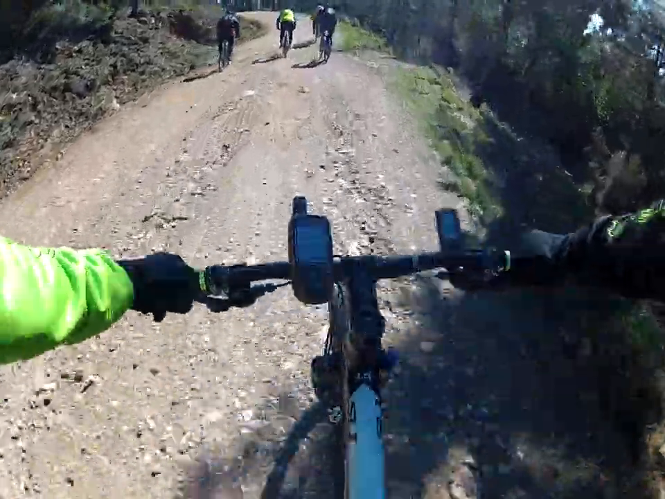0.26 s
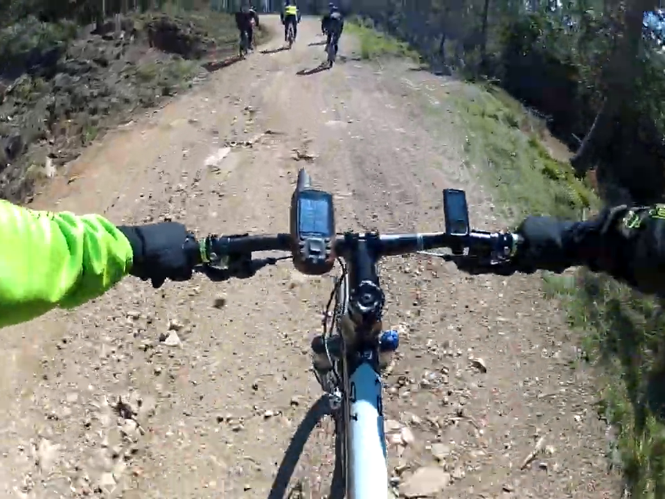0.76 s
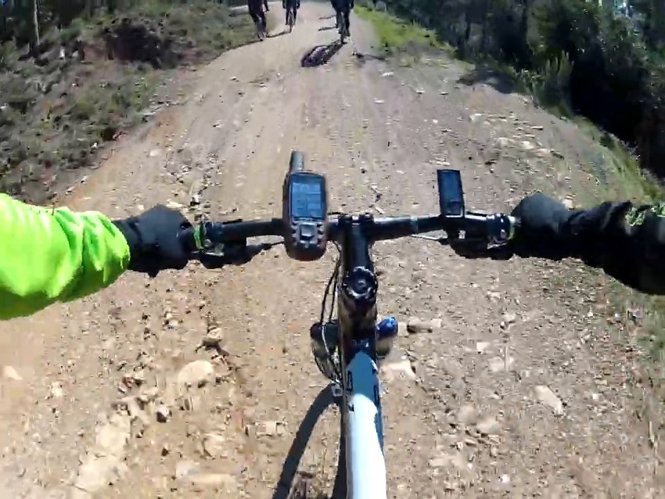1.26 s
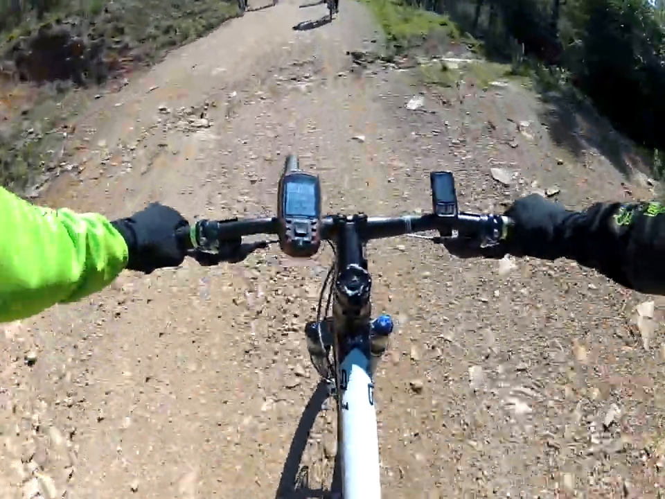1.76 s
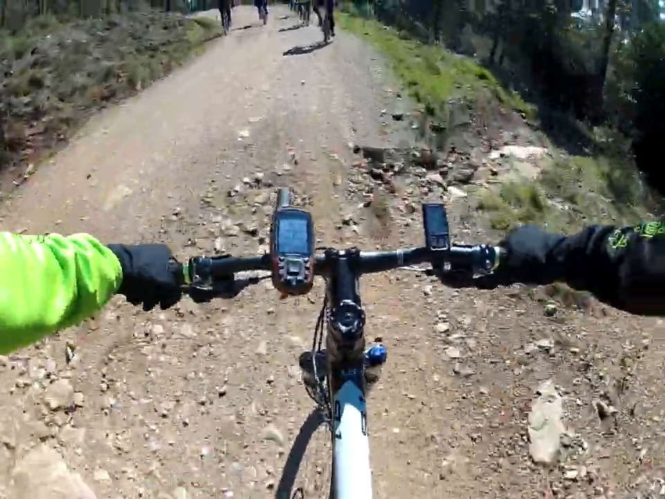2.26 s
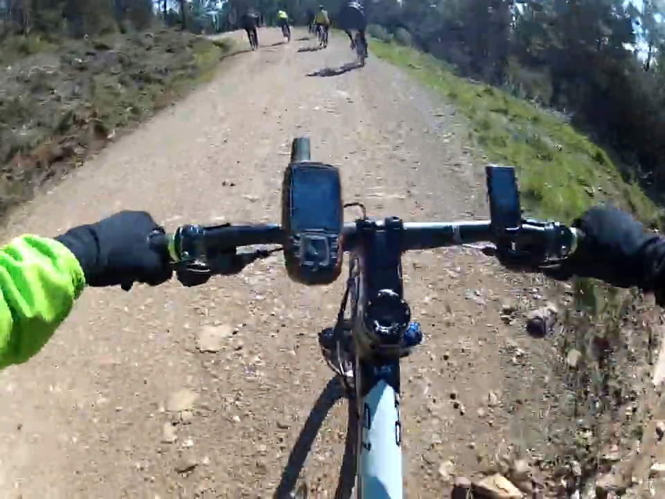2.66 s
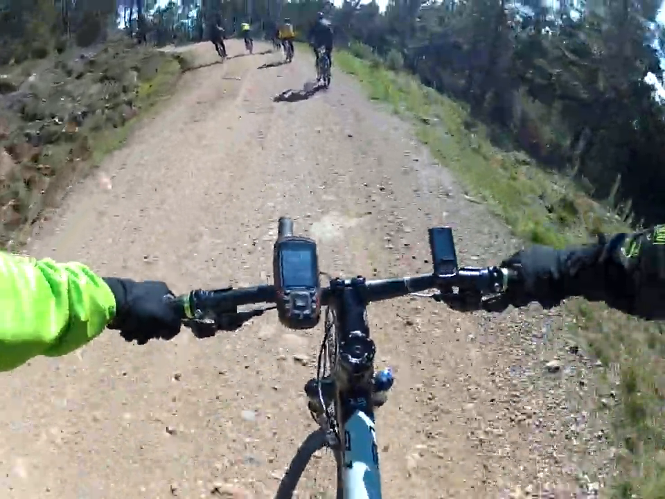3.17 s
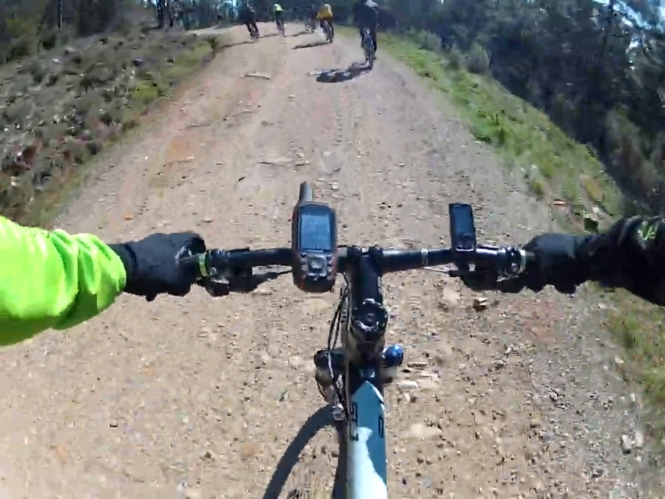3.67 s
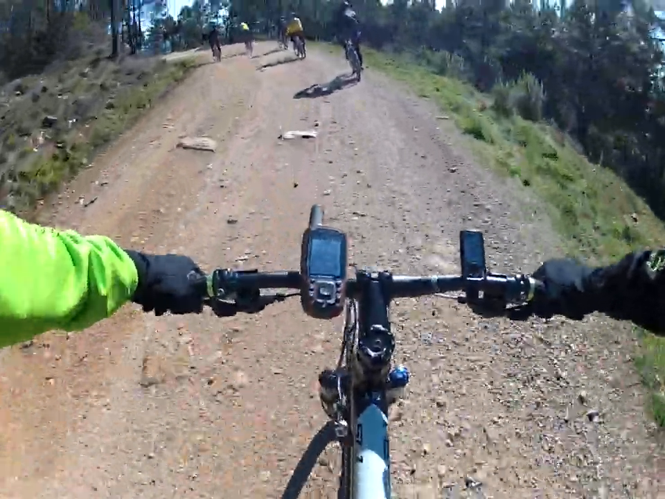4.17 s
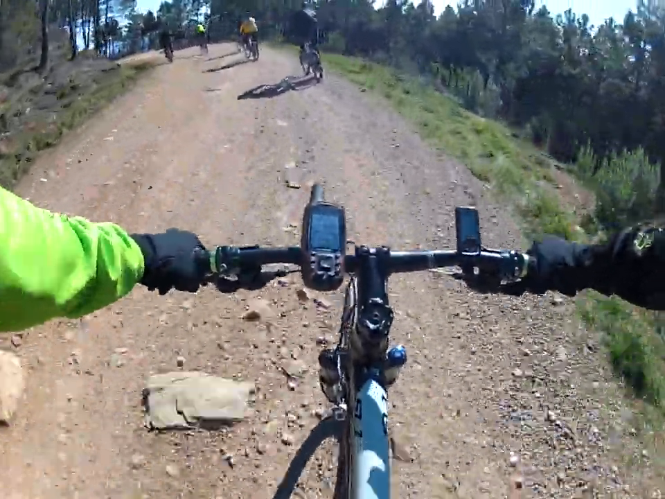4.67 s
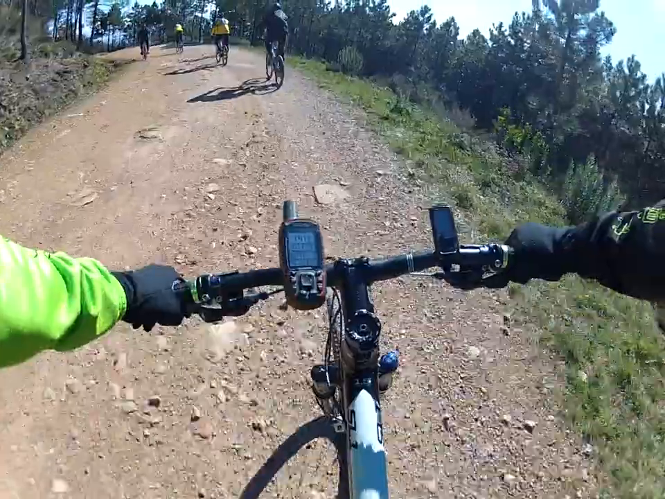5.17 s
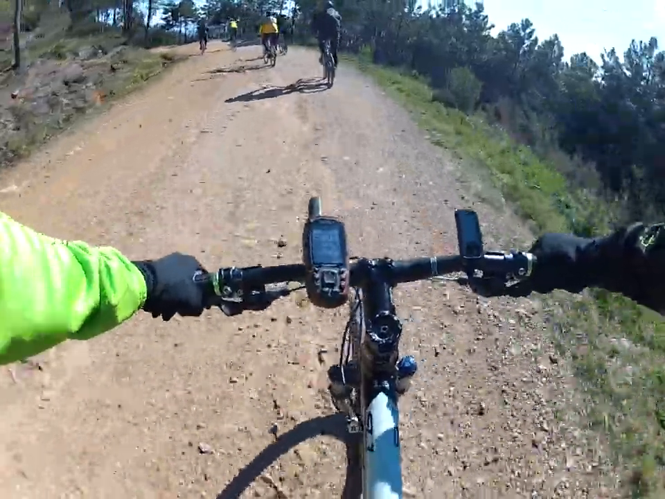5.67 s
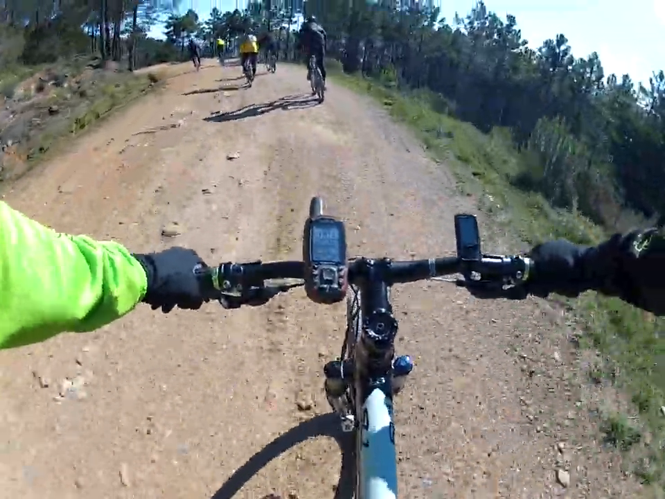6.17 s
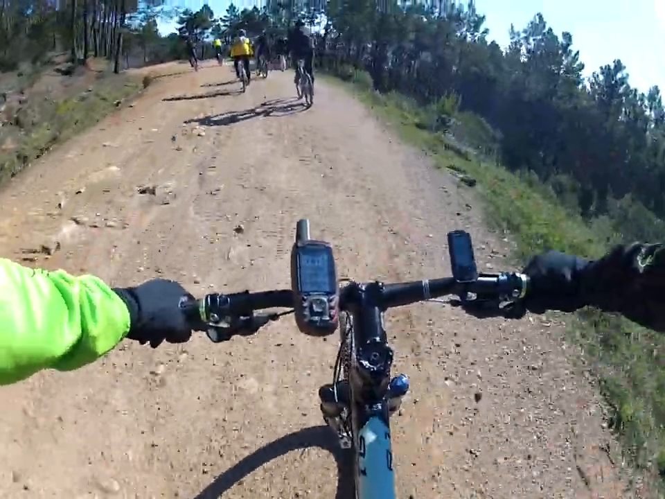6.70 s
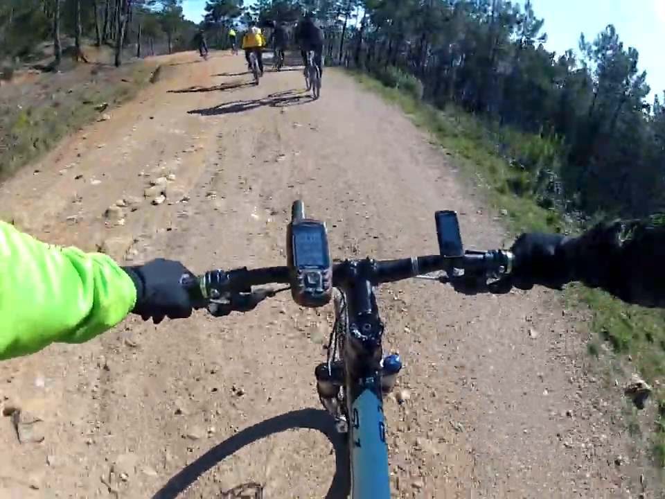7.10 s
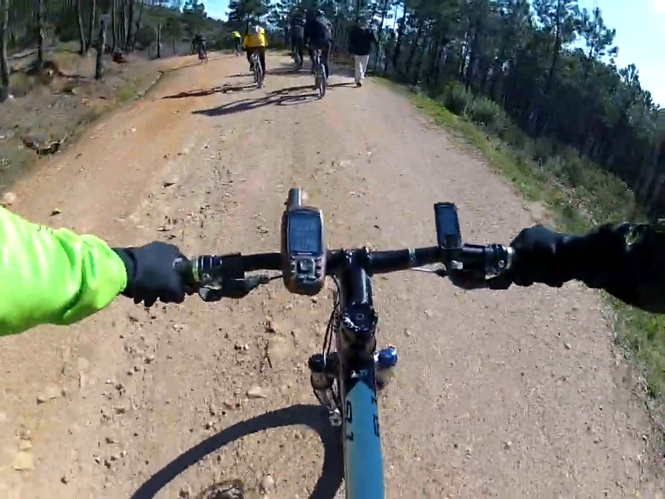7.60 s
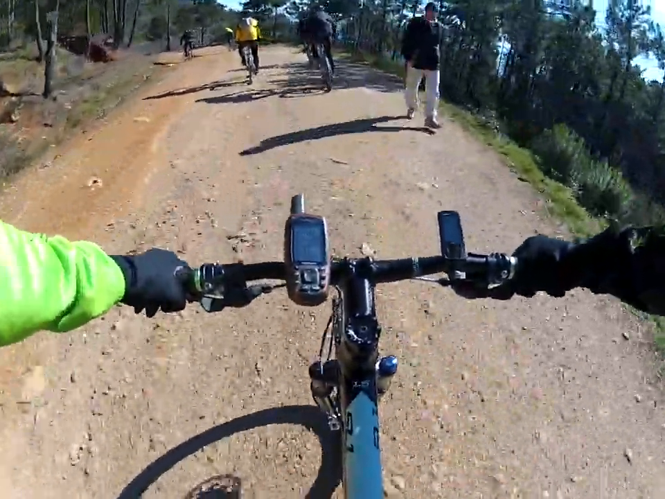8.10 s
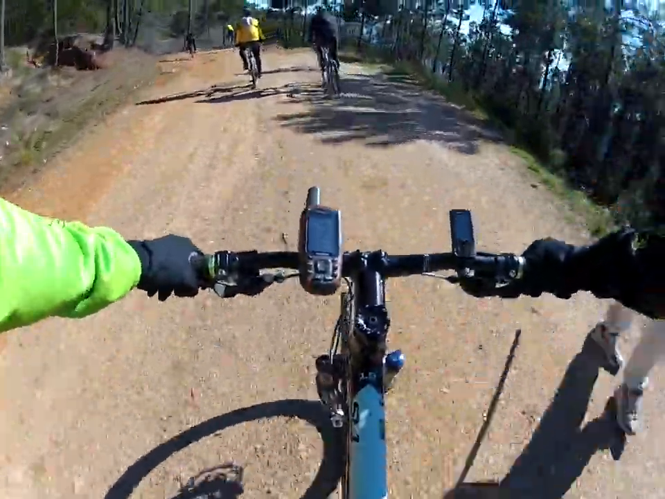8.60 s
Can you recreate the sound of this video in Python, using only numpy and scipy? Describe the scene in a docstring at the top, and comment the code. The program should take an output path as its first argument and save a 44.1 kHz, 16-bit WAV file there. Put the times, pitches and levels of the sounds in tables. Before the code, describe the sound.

A mountain bike rolls down an open gravel track, heard close and dry from a cased camera on the rider's chest. Tyres rumble and roar unevenly over a continuous gritty crunch of pebbles, while low wind flutters and thumps. At about 0.5 s a hard jolt knocks the mount, with a harness thump and loose clacks. From 0.8 to 1.8 s soft frame thuds come often, amid stone snaps, gusts and a clack near 1.7. Rough drumming continues around 2.5 to 2.9 s; a brief tread hum swells near 3.5. At 4.1 to 4.2 s hollow clacks and bright chip ticks cluster. The rumble then eases, with a strong gust at 4.8 and more rattles at 4.9. Sharp stones snap at 5.9, then thickly from 6.4 to 7.05 s. Rougher rumble returns after 7.3, with a clack at 8.25 and final snaps at 8.3 and 8.8.

```python
"""Tyres rumble and crunch over gravel, stones snap, loose parts clack, wind buffets and a jolt knocks.
A mountain bike rolls down a gravel track, heard from a cased camera on the rider's chest.
Rumble, hiss and wind are shaped noise; grains, stones and chips are short noise bursts or fading tones.
The frame, case, loose part and camera mount ring as sets of fading tones. The case colours everything."""
import sys
import numpy as np
from scipy import signal
from scipy.fft import rfft, irfft, next_fast_len
from scipy.io import wavfile
from scipy.ndimage import uniform_filter1d, map_coordinates

SR = 44100
rng = np.random.default_rng(int(sys.argv[2]) if len(sys.argv) > 2 else 0)


def transcribe(u):
    """Save the signal u as a 16-bit wav file named by the first command-line argument.

    u: samples, shape (n,) or (channels, n), limited to [-1, 1]; the rate is SR.
    q: integer samples, one column per channel.
    """
    v = np.clip(np.atleast_2d(u).T, -1, 1)
    q = np.round(v * 32767).astype(np.int16)
    wavfile.write(sys.argv[1], SR, q)


N = 390285  # length in samples

# Levels in the tables are starting points: the functions may shift or vary them.
# "Fade time" means the time to fall by 60 dB.

# How hard the wind buffets. Each row: time in seconds, level in dB.
WIND_LEVEL = [(0.0, -32.5), (0.17, -41.5), (0.98, -38), (1.06, -43.5), (1.5, -35.5), (2.86, -43.5),
              (3.89, -41.5), (3.97, -31.5), (4.26, -40.5), (4.41, -36.5), (5.02, -36), (5.16, -47.5),
              (5.56, -36), (6.16, -43.5), (6.63, -40.5), (6.68, -48), (7.4, -39), (8.85, -42)]
# Single strong gusts. Each row: middle in seconds, level in dB, rate of the pressure swing in Hz.
GUSTS = [(.28, -26, 32.3), (0.528, -28, 30.2), (.78, -32, 32), (.955, -27, 33), (1.461, -24.5, 41.5),
         (1.608, -30, 48.3), (1.679, -32, 45), (1.82, -26, 28), (2.05, -27, 27.5), (3.914, -31, 34.2),
         (3.99, -30, 27.6), (4.491, -33, 30.2), (4.779, -20.5, 31), (5.02, -25.5, 30.8), (5.51, -35, 42),
         (5.72, -44, 48), (6.579, -27, 27)]
# Tone of the wind. Each row: frequency in Hz, relative level in dB per Hz.
BUFFET_TONE = [(8, -38), (18, 1.5), (28, -4.5), (45, -13.5), (70, -21.5), (120, -33), (300, -75),
               (1000, -100)]

# Jolts on the camera mount. Each row: start in seconds, level in dB.
JOLTS = [(.5266, -19.5)]
# Ringing tones of the mount. Each row: frequency in Hz, level in dB, fade time in seconds.
MOUNT_MODES = [(498, -8, 0.03), (770, -18, 0.025), (1020, -5.5, 0.016), (1630, -2.5, 0.017),
               (1780, -6.5, 0.018), (10200, -14, 0.011), (12650, -8.5, 0.013), (13900, -20, 0.016)]
# Thump of the chest harness. Each row: frequency in Hz, level in dB, fade time in seconds.
HARNESS_MODES = [(88, 2.5, 0.055), (137, -2, 0.052), (261, -17, 0.018)]

# Loose parts clacking on bumps. Each row: start in seconds, level in dB, pitch of the lowest tone in Hz.
CLACKS = [(0.483, -38.5, 1560), (0.541, -37.5, 1590), (1.44, -38.5, 1570), (1.6702, -43.5, 1580),
          (1.722, -32, 1555), (2.8567, -40, 1580), (3.7184, -44, 1520), (4.0923, -31.5, 1575),
          (4.152, -32, 1564), (4.22, -36, 1590), (4.387, -43.5, 1560), (4.892, -38, 1570),
          (4.938, -36.5, 1565), (7.473, -40, 1560), (8.2485, -38.5, 1560)]
# Ringing tones of the loose part, moved to each clack's pitch.
# Each row: frequency in Hz, level in dB, fade time in seconds.
PART_MODES = [(1582, -0.5, 0.032), (1960, 1.5, 0.0062), (2340, -17, 0.0056), (2710, -5.5, 0.015),
              (3130, -9, 0.015), (4450, -17, 0.016), (10510, -16.5, 0.032)]
# Tone of the click in a clack. Each row: frequency in Hz, relative level in dB per Hz.
CLICK_TONE = [(300, -6), (1000, 12), (1500, -15), (2000, 10), (3000, 7), (4500, 1.5), (7500, 2),
              (10000, -2), (15000, 2.5)]

# Flung chips of stone ticking on the frame. Each row: start in seconds, level in dB.
CHIPS = [(0.438, -43), (.444, -42), (1.416, -42), (1.723, -44), (3.546, -46), (3.877, -44), (4.147, -35),
         (4.153, -32), (4.222, -29), (4.231, -38), (4.8272, -34.5), (4.907, -41), (7.627, -46),
         (8.3327, -41), (8.818, -43)]
# Tone of a chip's tick. Each row: frequency in Hz, relative level in dB per Hz.
CHIP_TONE = [(800, -11), (2500, 6.5), (4200, 1.5), (5500, -0.5), (8000, -1), (10000, -16), (15000, -9)]

# Rocks that thud through the frame. Each row: start in seconds, level in dB.
THUDS = [(0.348, -40), (0.741, -32), (.81, -27), (1.187, -28.5), (1.32, -25.5), (1.463, -24.5),
         (1.597, -26), (1.745, -32), (2.484, -32), (2.89, -31), (3.106, -27), (3.793, -34), (3.889, -25.5),
         (3.967, -29), (4.769, -29), (4.985, -36), (6.576, -35), (7.212, -32), (8.093, -30.5), (8.61, -31)]
# Ringing tones of the frame on its tyres. Each row: frequency in Hz, level in dB, fade time in seconds.
FRAME_MODES = [(90.6, -1, 0.082), (151, -13, 0.08), (220, -8.5, 0.033)]
# Dull tone of a tyre on rock. Each row: frequency in Hz, relative level in dB per Hz.
IMPACT_TONE = [(60, 5), (200, 4), (400, -15), (900, -7), (2000, -10.5), (3200, -31), (8000, -39)]

# The track is rocky, then smoother from about 4.3 to 7 s.
# Each row: time in seconds, frame shudder in dB, tyre roar in dB.
GROUND_LEVELS = [(0.0, -50, -54), (0.76, -47, -51.5), (1.21, -52, -57.5), (1.55, -44.5, -52),
                 (1.9, -48.5, -53.5), (2.24, -50, -57), (2.59, -48, -52.5), (3.82, -50, -55),
                 (3.97, -48, -56), (4.51, -59.5, -61), (4.95, -58, -58.5), (6.01, -59, -61.5),
                 (6.36, -54, -60.5), (6.92, -60, -65.5), (7.32, -50, -56.5), (7.96, -56, -60),
                 (8.28, -49.5, -55.5), (8.85, -52.5, -58)]
# Rocky patches that the tyres drum over. Each row: middle in seconds, length in seconds, added dB.
PATCHES = [(0.475, 0.12, 6), (0.735, 0.11, 3.5), (1.346, 0.11, 7.5), (2.464, 0.054, 5.5), (2.536, 0.048, 6),
           (2.703, 0.057, 5), (2.833, 0.048, 2), (4.126, 0.17, 3), (4.907, 0.091, 3.5), (5.247, 0.055, 2),
           (6.583, 0.13, 2.5), (7.07, 0.12, 2.5), (7.493, .05, 4.5), (7.61, 0.058, 3.5), (8.096, 0.19, 3.5)]
# Ridges that press the tread into a brief louder hum. Each row: middle in seconds, level in dB.
RIDGES = [(2.18, -52), (2.45, -64), (3.461, -45), (4.92, -51), (4.97, -52), (5.47, -58), (5.84, -63)]
# Tone of the frame shudder. Each row: frequency in Hz, relative level in dB per Hz.
SHUDDER_TONE = [(35, -16.5), (80, 3.5), (150, -0.5), (210, -3.5), (300, -13), (480, -19.5), (1500, -58)]
# Tone of the tyre roar. Each row: frequency in Hz, relative level in dB per Hz.
ROAR_TONE = [(150, -10.5), (350, -1.5), (550, -2.5), (900, -4), (1300, -11), (2200, -9), (5000, -31),
             (15000, -20.5)]
# Tone of the tread hum. Each row: frequency in Hz, relative level in dB per Hz.
HUM_TONE = [(170, -33), (240, -7), (270, -1), (330, 0), (365, -2), (410, -14), (560, -29.5)]

# How loudly the gravel crunches. Each row: time in seconds, level in dB.
GRAVEL_LEVEL = [(0.0, -56), (0.57, -57.5), (1.08, -55.5), (1.9, -53), (2.17, -53), (4.63, -54), (5.03, -50),
                (5.44, -54), (6.41, -54), (6.56, -51), (7.02, -61), (7.49, -51.5), (7.81, -57.5),
                (8.23, -53), (8.35, -58), (8.85, -58.5)]
# Tone of the gravel crunch. Each row: frequency in Hz, relative level in dB per Hz.
CRUNCH_TONE = [(200, -27), (700, -11.5), (1400, 0), (2200, 3.5), (3000, -4.5), (4000, -9), (5000, -15.5),
               (7000, -18), (9000, -12.5), (11000, -20), (15000, -17.5), (16000, -40)]
# Pebbles knocking together. Each row: ratio to the main pitch (no unit), level in dB.
PEBBLE_MODES = [(1, -2), (1.47, -7.5), (4, -12)]
# Bright crack of a pebble. Each row: frequency in Hz, relative level in dB per Hz.
CRACK_TONE = [(1500, -17), (2400, 8), (3400, 9.5), (4500, -4.5), (7000, -8), (9000, 0), (11500, -7.5),
              (14500, 0), (16000, -24)]
# Pockets of loose gravel under the tread. Each row: middle in seconds, length in seconds, level in dB.
POCKETS = [(0.016, 0.011, -40), (0.162, 0.012, -42.5), (.27, 0.034, -46), (0.703, 0.044, -49),
           (0.867, 0.011, -47.5), (1.817, 0.048, -44), (1.923, 0.035, -46), (2.19, 0.054, -49),
           (2.566, 0.016, -44), (2.89, 0.015, -42), (2.947, 0.0097, -44), (3.722, 0.011, -52),
           (4.127, .04, -42), (4.184, .025, -46), (4.237, 0.072, -49), (4.659, 0.019, -50),
           (4.736, 0.025, -48.5), (4.912, 0.055, -48), (5.044, 0.026, -47), (5.464, 0.0092, -48),
           (5.87, 0.035, -47.5), (6.553, 0.022, -49), (7, 0.061, -50.5), (7.162, 0.013, -49),
           (7.209, .014, -51), (7.363, 0.056, -52.5), (8.104, 0.027, -56), (8.222, 0.042, -46)]

# Large stones snapping under the tyres. Each row: start in seconds, level in dB,
# pitch of the brief ring in Hz, brightness of the case's ring in dB per octave.
STONES = [(0.396, -29.5, 2480, 6), (0.4464, -37, 2100, 0), (0.4817, -34, 1850, -10), (0.8607, -46, 2330, 4),
          (1.0191, -39, 2380, 4), (1.1069, -38.5, 2350, 2), (1.146, -39, 2320, 0), (1.1603, -34, 2170, -5),
          (1.3318, -31, 2410, 10), (1.376, -35.5, 2350, -6), (1.4186, -30.5, 2300, 9),
          (1.6162, -34, 2660, 10), (1.6911, -31.5, 2400, 5), (1.8282, -38, 2250, -6),
          (1.9723, -37.5, 2300, 0), (2.026, -39, 2750, 15), (2.0612, -42, 2300, 5),
          (2.2438, -41.5, 2430, 18), (2.4678, -39, 2200, 0), (2.4905, -31.5, 2300, 1),
          (2.5305, -34.5, 2260, 8), (2.717, -33, 2270, 13), (2.818, -41, 2300, -2),
          (2.8558, -37, 1930, -12), (3.039, -36.5, 2250, 14), (3.1804, -34, 2300, 8),
          (3.463, -34.5, 2370, -1), (3.5451, -29.5, 2250, -9), (3.7184, -36, 2180, -10),
          (3.8766, -38, 2420, 2), (3.9707, -36.5, 2300, -1), (4.201, -37, 2270, 3),
          (4.3093, -31.5, 2330, -3), (4.585, -37, 2310, -13), (4.6645, -40, 2220, -6),
          (4.829, -43, 2300, 0), (4.8628, -37, 2280, 0), (5.034, -44, 2330, 2), (5.1662, -45, 2260, -2),
          (5.467, -43, 2300, -3), (5.6161, -40, 2380, 0), (5.8115, -37.5, 2180, 1),
          (5.913, -29.3, 2280, 3.5), (6.33, -37.5, 2220, -3), (6.3869, -40, 2400, 5),
          (6.4635, -26, 2280, 7), (6.501, -36, 2230, -2), (6.5432, -34, 2360, -5), (6.5517, -32.5, 2350, 0),
          (6.592, -34, 2290, -3), (6.628, -42, 2300, 0), (6.6436, -28, 2230, 0), (6.6777, -35.5, 2290, -3),
          (6.8229, -41.5, 2230, -2), (6.926, -37, 2830, 4), (7.0255, -41, 2260, 2), (7.041, -30, 2480, 7),
          (7.283, -39, 2330, -4), (7.754, -41.5, 1900, -4), (7.9932, -37.5, 2300, 0),
          (8.332, -30, 2440, 12), (8.818, -28.5, 2500, 3)]
# Short ring of the camera case at each snap.
# Each row: frequency in Hz, level in dB, fade time in seconds.
CASE_RING_MODES = [(1797, -5.5, .012), (2820, -8, 0.012), (3372, -7, 0.0092), (4150, -22.5, 0.01)]
# Body of a snap. Each row: frequency in Hz, relative level in dB per Hz.
SNAP_TONE = [(200, -37), (1000, -3.5), (1500, 0), (1900, 12.5), (2800, 6.5), (3600, -1.5), (4800, -22),
             (7000, -54), (12000, -27)]
# Bright edge of a snap. Each row: frequency in Hz, relative level in dB per Hz.
SPARK_TONE = [(3000, -38), (6500, -30), (8500, 1), (11000, -7), (15000, -2.5), (16500, -32)]

# Resonances and hollows of the camera case. Each row: centre in Hz, width in Hz, boost or cut in dB.
CASE_BANDS = [(537, 153, 4.5), (739, 83, 5.5), (1062, 130, 7.5), (1264, 133, -3.5), (1473, 98, 4.5),
              (1890, 470, 3), (2013, 59, -14), (2330, 190, 6.5), (2660, 83, 3), (2930, 76, 4.5),
              (3343, 240, 6.5), (3740, 92, -8), (4150, 120, 4), (5130, 76, 6.5), (6060, 940, -15.5),
              (6830, 120, 6), (7250, 720, -2), (7940, 170, 2.5), (8200, 160, -10), (8640, 210, 6.5),
              (9070, 290, 3.5), (9680, 280, 11), (10090, 160, 7), (10420, 220, 4), (10930, 110, 3),
              (12290, 2250, -8.5), (13570, 150, 9), (13880, 250, 4), (13930, 180, 6), (14850, 300, 0)]

GUST_S, RIDGE_S = 0.028, 0.014  # half lengths of a gust and of a ridge's hum, in seconds
HUM_DB = -60  # steady hum of the tread
# A hard clack's table level, the level of its click and of the second click, all in dB.
HARD_DB, CLICK_DB, SECOND_CLICK_DB = -26.5, -26.5, -35
CLICK_GROWS = 1.44  # dB of click for each dB of clack: the click grows faster than the ring
REBOUND_S, REBOUND_DB = 0.008, -12  # the part touches once more: delay, level against the table
STONE_HZ, STONE_OCTAVES = 2240, 0.205  # the brief ring of a small stone, its spread
SMALL_PER_S, SMALL_DB, SMALL_SPREAD_DB = 8, 9, 1  # small stones: rate, level over the crunch, spread
TOP_HZ = 15450  # upper band limit of the camera


def amp(db):
    """Turn decibels into a gain."""
    return 10 ** (np.asarray(db) / 20)


def unit(x):
    """Scale a sound to an rms (average strength) of 1."""
    return x / np.sqrt(np.mean(x ** 2) + 1e-20)


def along(points, hz):
    """Read a table of (Hz, value) points, evenly spaced in pitch between them."""
    f, v = np.transpose(points)
    return np.interp(np.log(hz + 1), np.log(f), v)


def curves(rows):
    """Give one value per sample for each column after the time."""
    s, *columns = np.transpose(rows)
    return [np.interp(np.arange(N) / SR, s, column) for column in columns]


def wobble(rate):
    """Draw a smooth random curve with the given number of random points a second."""
    points = rng.standard_normal(int(N * rate / SR) + 4)
    return map_coordinates(points, [np.arange(N) * rate / SR])


def swell(s, half_s):
    """Make a smooth bump of height 1 around time s."""
    return np.exp(-((np.arange(N) / SR - s) / half_s) ** 2)


def noise(tone):
    """Make steady coloured noise of rms 1."""
    m = next_fast_len(N + 8192)
    white = rfft(rng.standard_normal(m))
    gain = amp(along(tone, np.fft.rfftfreq(m, 1 / SR)))
    return unit(irfft(white * gain, m)[:N])


def response(gain_db, size=4096):
    """Make a filter with the given dB gain over frequency that never sounds ahead of its input."""
    cepstrum = irfft(np.log(amp(gain_db(np.fft.rfftfreq(size, 1 / SR)))))
    # Folding the second half onto the first gives the filter its earliest possible response.
    cepstrum[1:size // 2] *= 2
    cepstrum[size // 2 + 1:] = 0
    return irfft(np.exp(rfft(cepstrum)))


def coloured(x, tone):
    """Filter a sound to the given tone, keeping the power that white noise would have."""
    h = response(lambda hz: along(tone, hz))
    return signal.oaconvolve(x, h / np.linalg.norm(h))[:N]


def add(track, s, sound):
    """Mix a sound into the track at time s."""
    part = track[max(round(s * SR), 0):][:len(sound)]
    part += sound[:len(part)]


def burst(t60, attack, size=2048):
    """Make a brittle contact: a spray of tiny fractures, as noise that dies away."""
    t = np.arange(size) / SR
    return rng.standard_normal(size) * amp(-60 * t / t60) * (1 - np.exp(-t / attack))


def ring(modes, attack, scatter_db, detune, size=4096):
    """Sum fading tones, with random shifts of level and pitch at each blow."""
    t = np.arange(size) / SR
    tones = np.zeros(size)
    for hz, db, t60 in modes:
        fade = amp(db + scatter_db * rng.normal() - 60 * t / t60)
        pitch = hz * (1 + detune * rng.normal())
        tones += fade * np.sin(2 * np.pi * pitch * t)
    return tones * (1 - np.exp(-t / attack))


def random_grains(grains_per_s, spread_db, top):
    """Scatter single-sample clicks of random sign and level; top caps the random level draw."""
    hits = rng.random(N) < grains_per_s / SR
    signs = rng.choice([-1, 1], N)
    return hits * signs * amp(spread_db * np.minimum(rng.standard_normal(N), top))


def wind(level_db=1.6, flutter_db=2.0, gust_db=-1.5):
    """Eddies push on the case in slow lumps; now and then a gust swings the pressure harder."""
    buffet_db, = curves(WIND_LEVEL)
    eddies = noise(BUFFET_TONE)
    # Even out the noise's own slow swells, so that the level curve leads.
    strength = np.sqrt(np.abs(uniform_filter1d(eddies ** 2, size=6000)) + 0.017)
    buffets = amp(buffet_db + level_db + flutter_db * wobble(12)) * eddies / strength
    t = np.arange(N) / SR
    gusts = np.zeros(N)
    for s, db, hz in GUSTS:
        swing = np.sin(2 * np.pi * (hz * (t - s) + rng.random()))
        gusts += amp(db + gust_db) * swell(s, GUST_S) * swing
    return buffets + gusts


def jolt(crunch_db=-32):
    """A hard bump knocks the camera against its mount and shoves it into the harness."""
    knock, crunch = np.zeros((2, N))
    for s, db in JOLTS:
        add(knock, s, amp(db) * ring(MOUNT_MODES, attack=0.0002, scatter_db=0, detune=0))
        # The harness thumps just after the blow.
        add(knock, s + 0.005, amp(db) * ring(HARNESS_MODES, attack=0.001, scatter_db=0, detune=0))
        add(crunch, s, amp(crunch_db) * burst(t60=0.027, attack=0.00043))
    return knock + coloured(crunch, IMPACT_TONE)


def clacks():
    """A loose part strikes the frame with a click and a short hollow ring, then softly touches again."""
    rings, clicks = np.zeros((2, N))
    for s, db, pitch_hz in CLACKS:
        modes = [(hz * pitch_hz / PART_MODES[0][0], level, t60) for hz, level, t60 in PART_MODES]
        growth_db = CLICK_GROWS * (db - HARD_DB)
        rebound = ring(modes, attack=0.00093, scatter_db=7, detune=0.023)
        add(rings, s, amp(db + 7) * ring(modes, attack=0.0008, scatter_db=1, detune=0.008))
        add(rings, s + REBOUND_S, amp(db + REBOUND_DB) * rebound)
        add(clicks, s, amp(CLICK_DB + growth_db) * burst(t60=0.033, attack=0.00054))
        add(clicks, s + 0.004, amp(SECOND_CLICK_DB + growth_db) * burst(t60=0.078, attack=0.0012))
    return rings + coloured(clicks, CLICK_TONE)


def chips():
    """A flung chip hits metal with one dry, bright tick."""
    ticks = np.zeros(N)
    for s, db in CHIPS:
        add(ticks, s, amp(db) * burst(t60=0.016, attack=0.00037))
    return coloured(ticks, CHIP_TONE)


def thuds():
    """A wheel meets a rock and the frame answers with a soft low thud."""
    out = np.zeros(N)
    for s, db in THUDS:
        add(out, s, amp(db) * ring(FRAME_MODES, attack=0.004, scatter_db=0.5, detune=0.11))
    return out


def tyres(shudder_over_db=2.25, roar_over_db=0.0, uneven_db=0.75):
    """Rough ground shakes the frame, the casings roar and the tread knobs hum unevenly."""
    shudder_db, roar_db = curves(GROUND_LEVELS)
    patches_db = sum(db * swell(s, length / 2) for s, length, db in PATCHES)
    rocks_db = uneven_db * wobble(14) + patches_db
    bumps = wobble(45)  # shared by shudder and roar
    shaking = unit(noise(SHUDDER_TONE) * amp(1.1 * bumps))
    shudder = amp(shudder_db + shudder_over_db + rocks_db) * shaking
    roaring = unit(noise(ROAR_TONE) * amp(1.4 * bumps + 2.15 * wobble(130)))
    roar = amp(roar_db + roar_over_db + rocks_db) * roaring
    steady_press = amp(HUM_DB) * unit(amp(3.4 * wobble(20)))
    ridge_press = sum(amp(db) * swell(s, RIDGE_S) for s, db in RIDGES)
    hum = (steady_press + ridge_press) * noise(HUM_TONE)
    return shudder + roar + hum


def cobbles(per_s=30, level_db=3, spread_db=3):
    """Embedded stones bump the casings with short, dull pats."""
    _, roar_db = curves(GROUND_LEVELS)
    pats = np.zeros(N)
    for at in np.flatnonzero(rng.random(N) < per_s / SR):
        db = roar_db[at] + level_db + spread_db * rng.uniform(-0.73, 2.1)
        add(pats, at / SR, amp(db) * burst(t60=0.035, attack=0.00095))
    return coloured(pats, IMPACT_TONE)


def gravel(grains_per_s=1000, spread_db=0.5, clump_db=1.5, dust=0.44):
    """Grit cracks in clumps as the tread blocks press on it, over a hiss of dust."""
    crunch_db, = curves(GRAVEL_LEVEL)
    grains = unit(random_grains(grains_per_s, spread_db, top=2.5))
    hiss = dust * noise([(100, 0), (15000, 0)])
    clumps = amp(clump_db * wobble(110) + 2.0 * wobble(25))
    return amp(crunch_db - 4.5) * unit(coloured((grains + hiss) * clumps, CRUNCH_TONE))


def crackle(per_s=150, centre_hz=2350, octaves=0.363, cycles=22, level_db=-1.5, spread_db=4):
    """Single grains knock together, each with its own pitch and level; a tone fades over 22 cycles."""
    crunch_db, = curves(GRAVEL_LEVEL)
    out, t = np.zeros(N), np.arange(1024) / SR
    chance, pitch, size = rng.random(N), rng.standard_normal(N), rng.standard_normal(N)
    for at in np.flatnonzero(chance < per_s / SR):
        hz = centre_hz * 2 ** (octaves * pitch[at])
        db = crunch_db[at] + level_db + spread_db * min(size[at], 2)
        add(out, at / SR, amp(db - 60 * t * hz / cycles) * np.sin(2 * np.pi * hz * t))
    return out


def pebbles(per_s=46, spacing_s=0.003, spread_db=3, level_db=4.0, centre_hz=2300, octaves=0.335,
            grit_db=-4, edge_db=-1, count=2):
    """Small pebbles give way under the tread: each cracks, knocks at its own pitch and scrapes on grit."""
    crunch_db, = curves(GRAVEL_LEVEL)
    knocks, grit, edge = np.zeros((3, N))
    chance, pitch, size = rng.random(N), rng.standard_normal(N), rng.standard_normal(N)
    for at in np.flatnonzero(chance < per_s / SR):
        db = crunch_db[at] + level_db + spread_db * min(size[at], 1.3)
        hz = centre_hz * 2 ** (octaves * np.clip(pitch[at], -2, 1.5))
        modes = [(hz * ratio, level, 0.011) for ratio, level in PEBBLE_MODES]
        for k in range(count):
            s = at / SR + spacing_s * (k + rng.random())
            knock = ring(modes, attack=0.00064, scatter_db=0.5, detune=0.039, size=768)
            add(knocks, s, amp(db - 2 * k) * knock)
            add(edge, s, amp(db + edge_db - 2 * k) * burst(t60=0.02, attack=0.0013))
        add(grit, at / SR, amp(db + grit_db) * burst(t60=0.038, attack=0.0041))
    return knocks + coloured(grit, CRUNCH_TONE) + coloured(edge, CRACK_TONE)


def pockets(level_db=-5.0, grains_per_s=1300, spread_db=3, clump_db=3.5):
    """The tyre ploughs through a pocket of loose stones and a whole group crunches together."""
    grains = random_grains(grains_per_s, spread_db, top=2)
    press = sum(amp(db + level_db) * swell(s, length / 2) for s, length, db in POCKETS)
    return press * unit(coloured(grains * amp(clump_db * wobble(110)), CRUNCH_TONE))


def small_stones():
    """Choose random times, levels, pitches and brightness for small stones, in rows like STONES."""
    crunch_db, = curves(GRAVEL_LEVEL)
    rows = []
    for at in np.flatnonzero(rng.random(N) < SMALL_PER_S / SR):
        db = crunch_db[at] + SMALL_DB + SMALL_SPREAD_DB * rng.uniform(-1.5, 1)
        hz = STONE_HZ * 2 ** (STONE_OCTAVES * rng.normal())
        rows.append((at / SR, db, hz, 7 * rng.normal()))
    return rows


def stones(body_db=-3.0, edge_db=-12, tone_db=-0.5, case_ring_db=0.5):
    """Stones snap away from the tread: a crack, a brief ring in stone and case, then a spray of grit."""
    body, edge, tone, grit = np.zeros((4, N))
    for s, db, hz, bright_db in [*STONES, *small_stones()]:
        # A positive brightness lifts the case's tones above STONE_HZ and lowers those below.
        case_ring = [(f, level + case_ring_db + bright_db * np.log2(f / STONE_HZ), t60)
                     for f, level, t60 in CASE_RING_MODES]
        modes = [(hz, tone_db, 0.013)] + case_ring
        add(body, s, amp(db + body_db) * burst(t60=0.011, attack=0.00084))
        add(edge, s, amp(db + edge_db) * burst(t60=0.019, attack=0.00032))
        add(tone, s, amp(db) * ring(modes, attack=0.00056, scatter_db=1.5, detune=0.01, size=1024))
        add(grit, s + 0.003, amp(db - 15.0) * burst(t60=0.048, attack=0.0027))
    return coloured(body, SNAP_TONE) + coloured(edge, SPARK_TONE) + tone + coloured(grit, CRUNCH_TONE)


def scene():
    """Everything reaches the one microphone directly; the open hillside gives no echo."""
    bike = jolt() + clacks() + chips() + thuds()
    ground = tyres() + cobbles() + gravel() + crackle() + pebbles() + pockets() + stones()
    return (wind() + bike + ground)[None]


def record(dry):
    """The case rings at its own frequencies; the camera keeps nothing above its band limit."""
    def case_db(hz):
        """Add up the boosts and cuts of the case."""
        return sum(db * np.exp2(-(2 * (hz - centre) / width) ** 2) for centre, width, db in CASE_BANDS)

    m = next_fast_len(N + 8192)
    in_band = np.fft.rfftfreq(m, 1 / SR) < TOP_HZ
    return irfft(rfft(dry, m) * rfft(response(case_db), m) * in_band, m)[:, :N]


dry = scene()
out = record(dry)
transcribe(out)
```